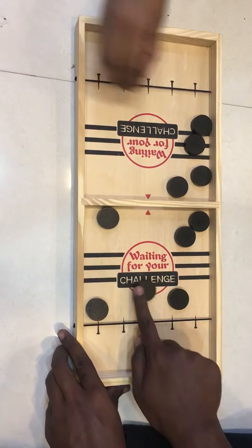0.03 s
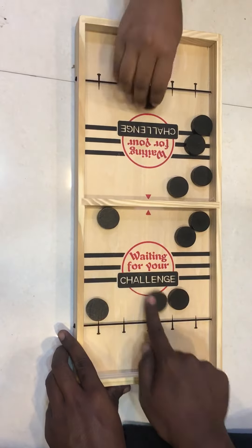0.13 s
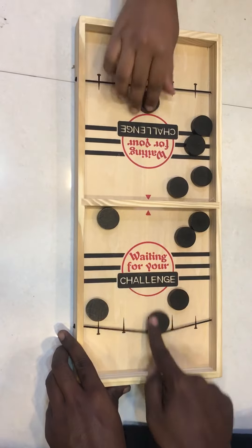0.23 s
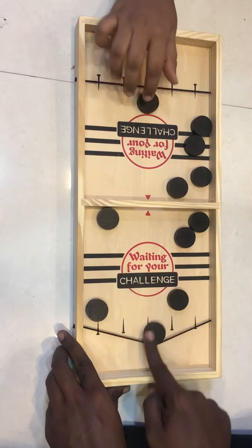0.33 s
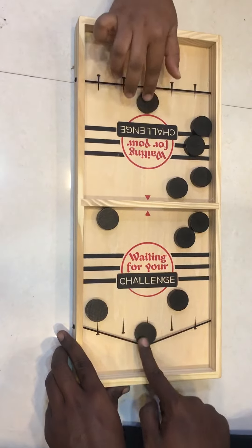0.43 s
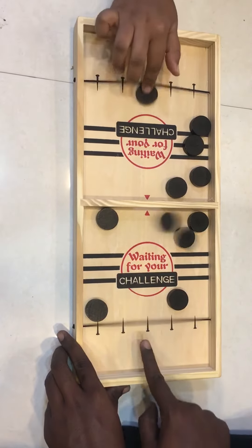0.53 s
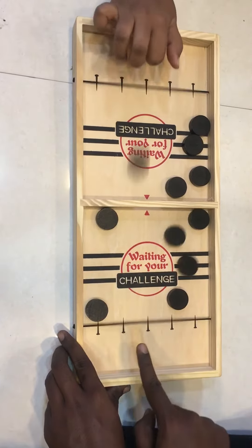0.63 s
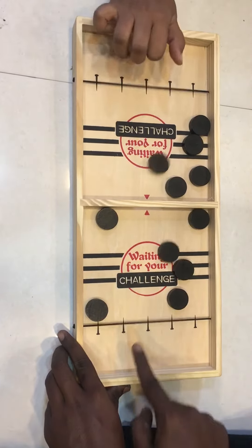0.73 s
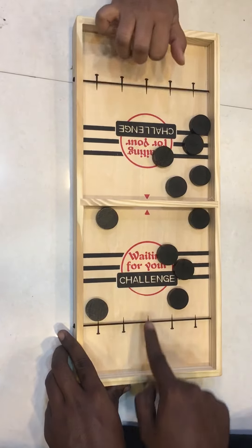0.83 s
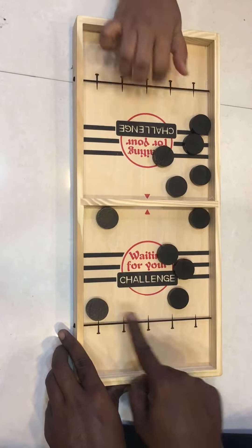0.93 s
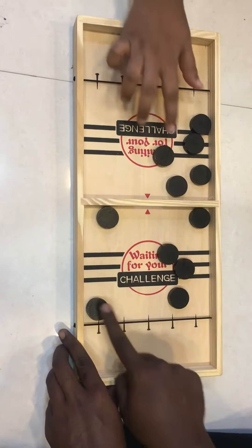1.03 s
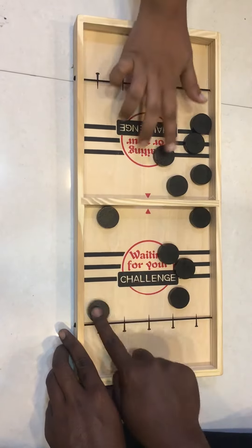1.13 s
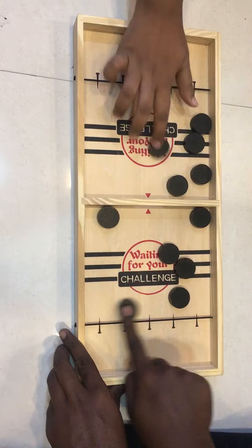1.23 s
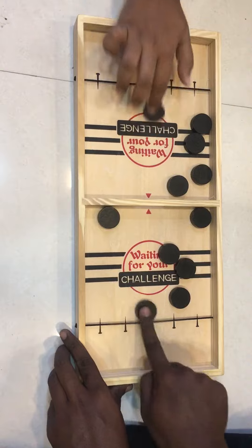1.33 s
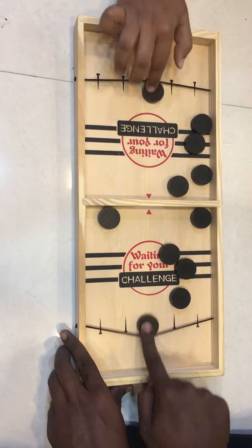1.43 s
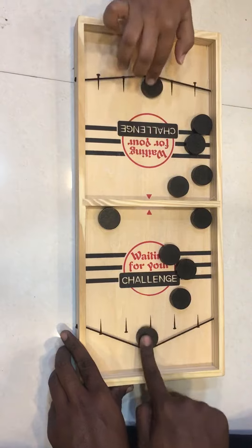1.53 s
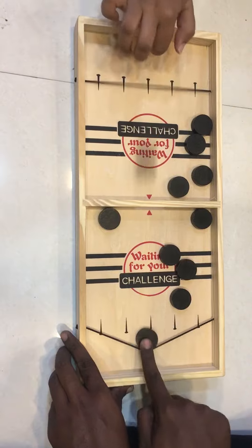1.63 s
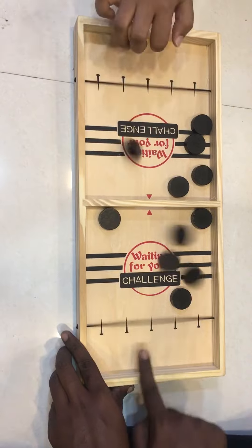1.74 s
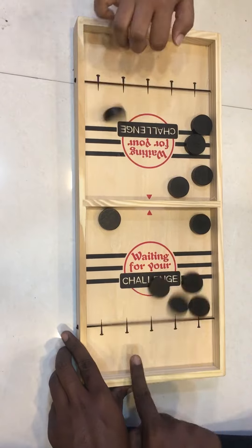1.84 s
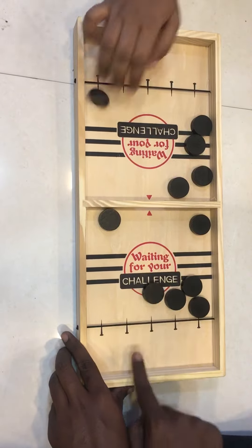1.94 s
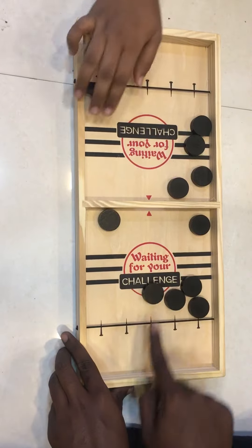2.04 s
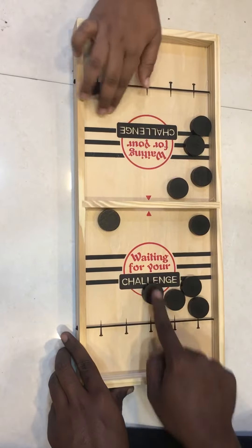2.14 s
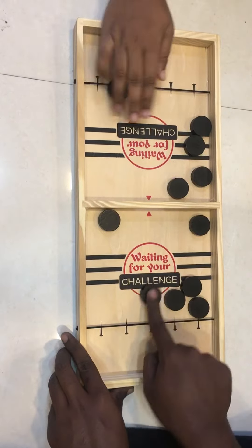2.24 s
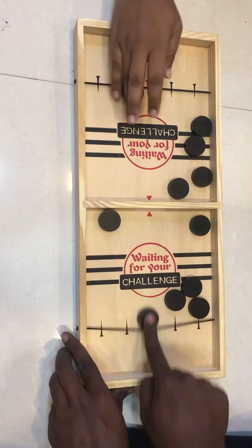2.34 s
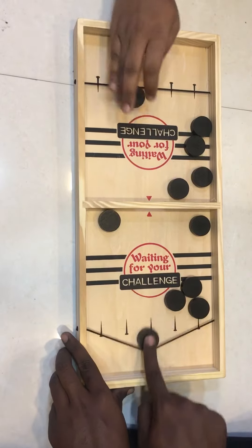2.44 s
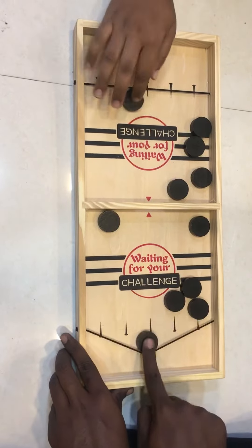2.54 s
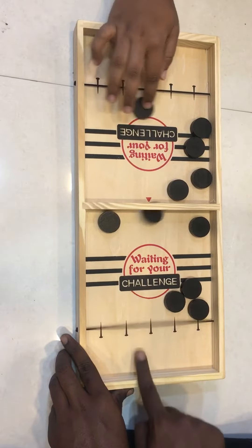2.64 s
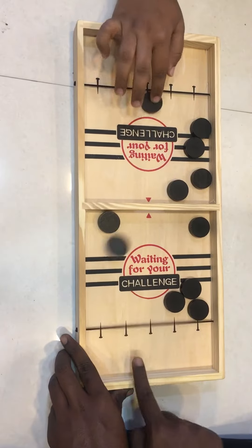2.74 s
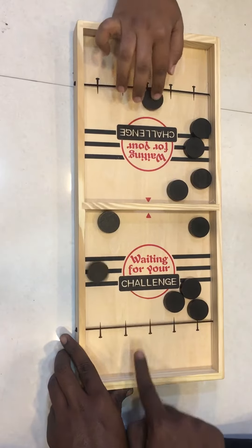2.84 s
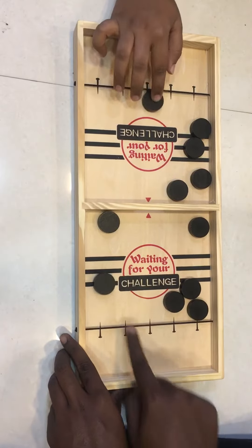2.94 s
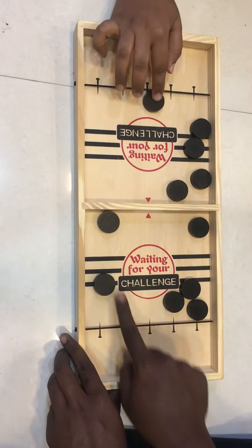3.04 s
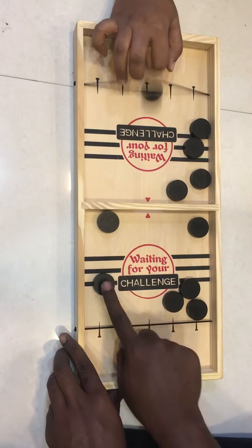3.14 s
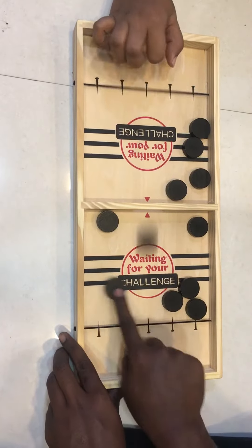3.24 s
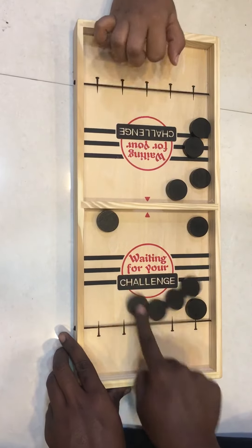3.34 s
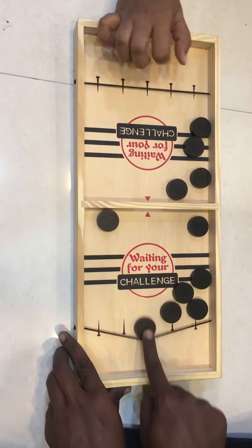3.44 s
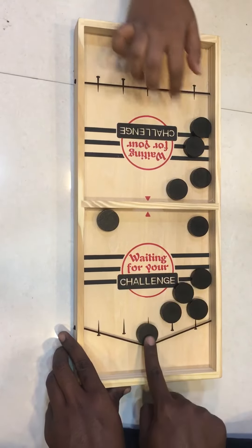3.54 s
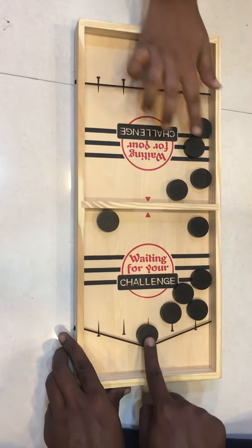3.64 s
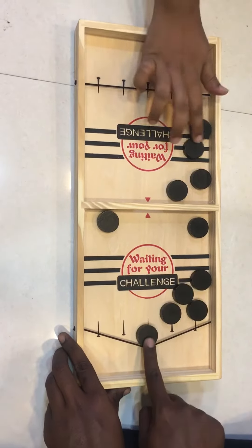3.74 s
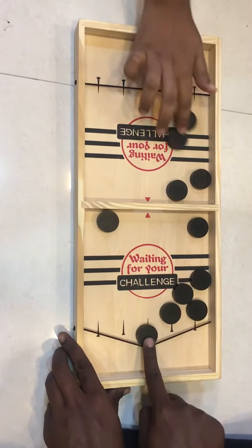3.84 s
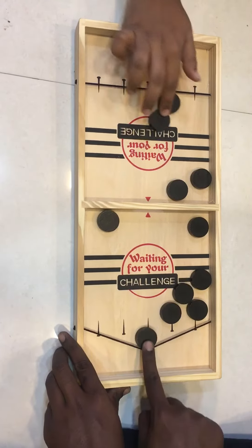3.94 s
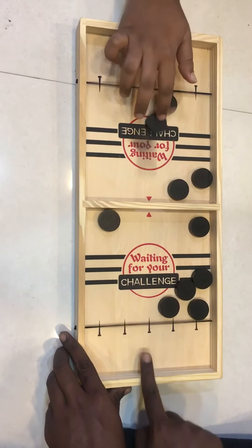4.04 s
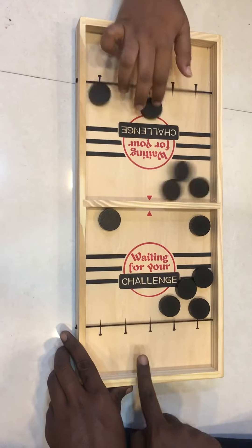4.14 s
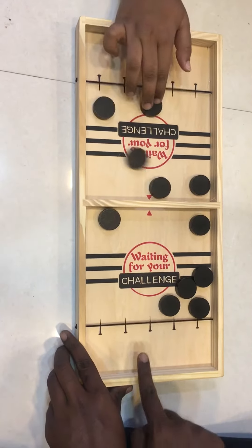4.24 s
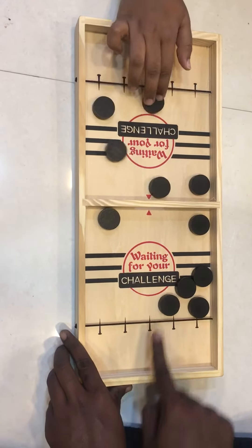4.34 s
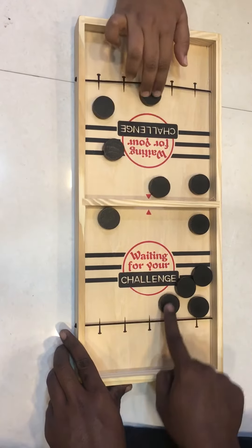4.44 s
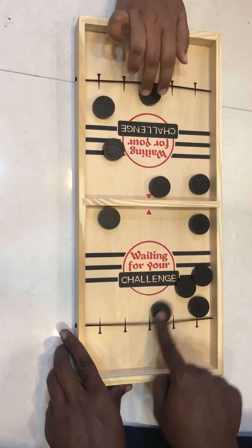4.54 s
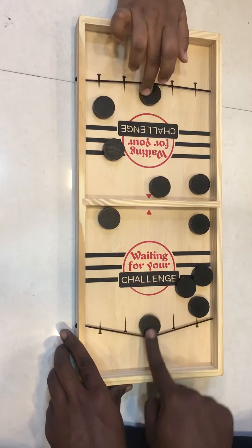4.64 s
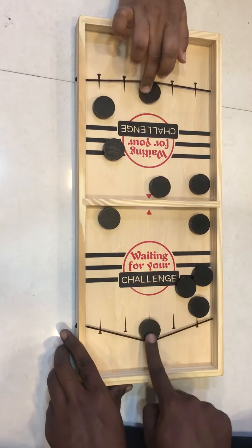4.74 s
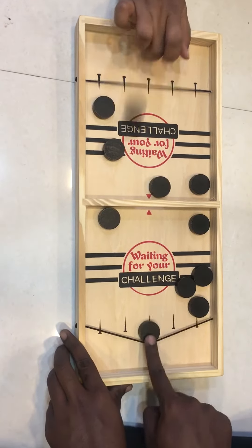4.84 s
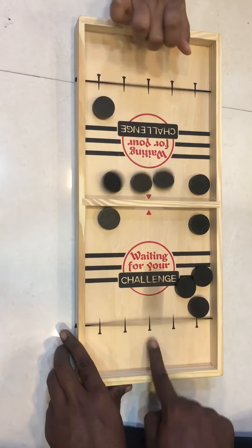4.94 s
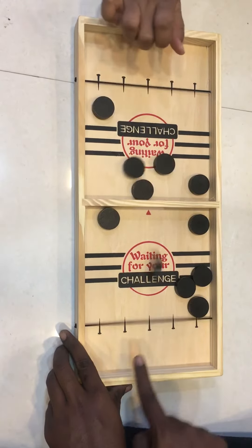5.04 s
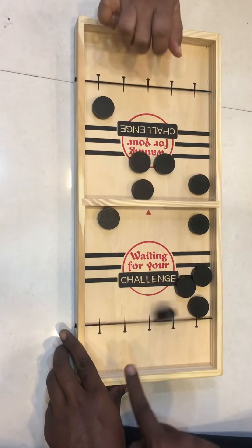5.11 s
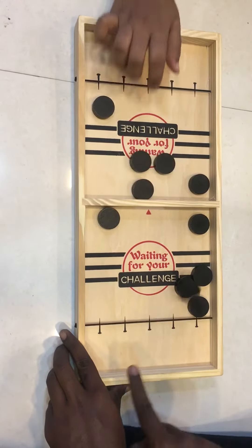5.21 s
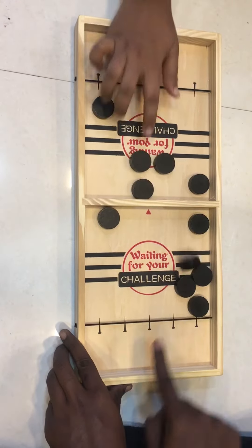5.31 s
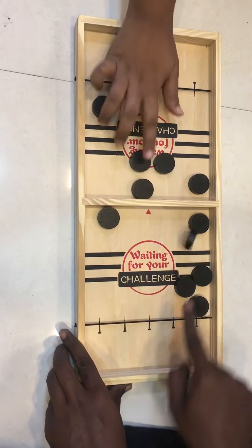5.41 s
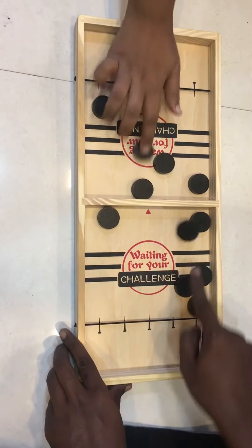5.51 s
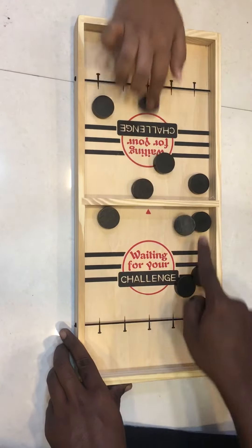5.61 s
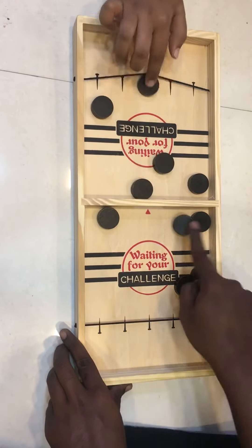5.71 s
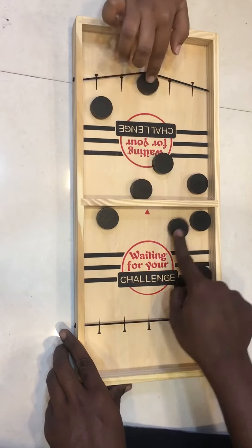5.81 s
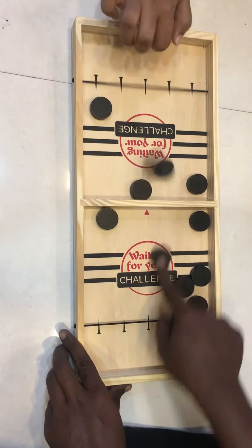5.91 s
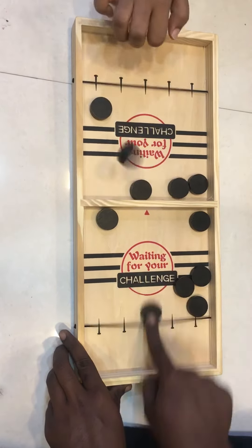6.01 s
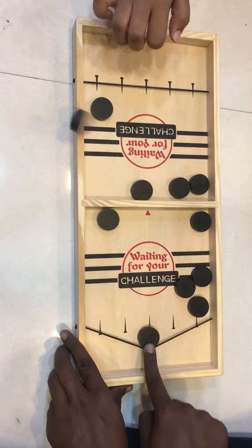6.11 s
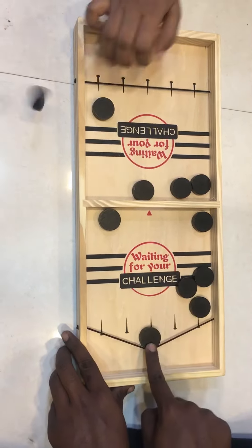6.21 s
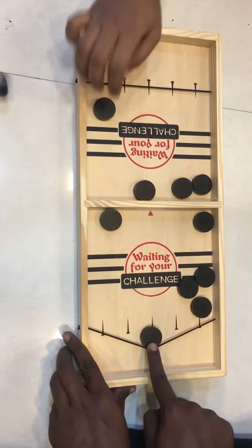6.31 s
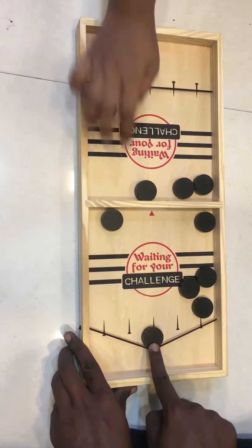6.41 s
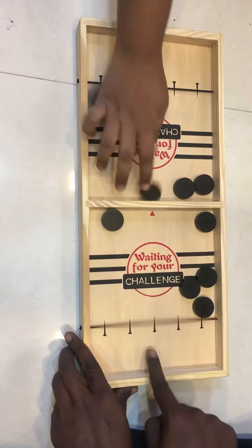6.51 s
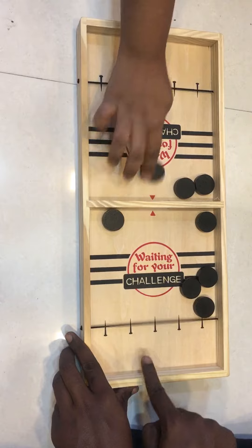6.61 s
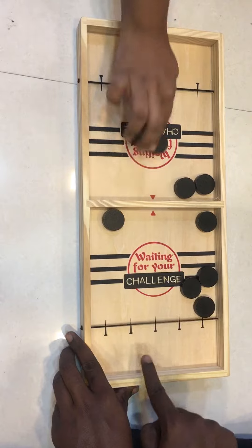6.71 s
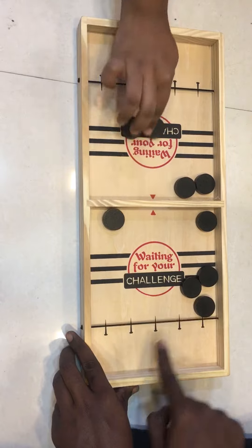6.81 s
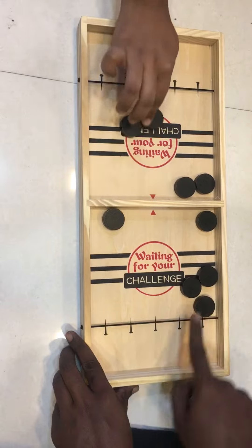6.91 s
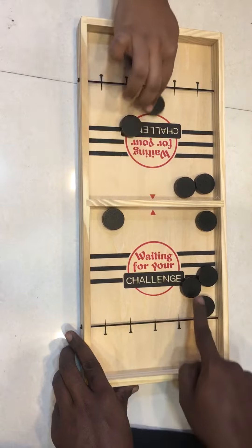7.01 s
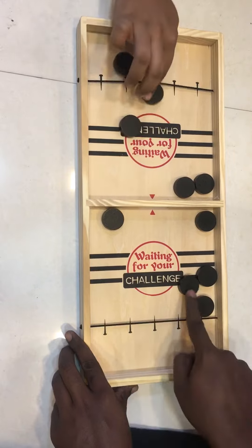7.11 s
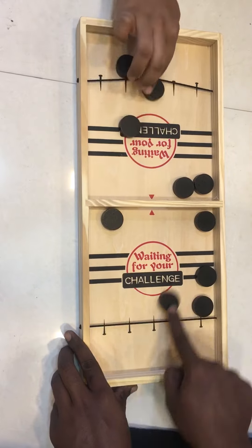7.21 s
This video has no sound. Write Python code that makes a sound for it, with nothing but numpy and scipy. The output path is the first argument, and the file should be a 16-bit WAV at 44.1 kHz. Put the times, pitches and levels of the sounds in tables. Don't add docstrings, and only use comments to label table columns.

```python
import sys
import numpy as np
from scipy import signal
from scipy.fft import rfft, irfft
from scipy.io import wavfile
from scipy.ndimage import uniform_filter1d

SR = 44100
rng = np.random.default_rng(int(sys.argv[2]) if len(sys.argv) > 2 else 0)


def linear_from_db(decibels):
    return 10 ** (np.asarray(decibels, float) / 20)


def int16_out(signal):
    q = np.round(np.clip(np.atleast_2d(signal).T, -1, 1) * 32767)
    wavfile.write(sys.argv[1], SR, q.astype(np.int16))


N = 320166


def unit_rms(x):
    return x / np.sqrt(np.mean(x ** 2) + 1e-20)


def unit_peak(x):
    return x / abs(x).max()


def read_spectrum(points, hz):
    f, value = np.transpose(points)
    return np.interp(np.log(hz + 1), np.log(f + 1), value)


def level_curve(rows):
    t, db = np.transpose(rows)
    return np.interp(np.arange(N) / SR, t, db)


def add(mix, start_s, sound):
    part = mix[round(start_s * SR):][:len(sound)]
    part += sound[:len(part)]


def colour(x, spectrum):
    gain_db = read_spectrum(spectrum, np.fft.rfftfreq(len(x), 1 / SR))
    return irfft(rfft(x) * linear_from_db(gain_db), len(x))


def tilt(spectrum, db_per_octave, pivot_hz):
    return [(f, db + db_per_octave * np.log2(f / pivot_hz)) for f, db in spectrum]


def resonate(x, hz, width_hz):
    turn = np.exp(2j * np.pi * np.cumsum(hz * np.ones(len(x))) / SR)
    r = np.exp(-np.pi * width_hz / SR)
    return 2 * (turn * signal.lfilter([1 - r], [1, -r], x / turn + 1e-18)).real


def ring_modes(modes, t, luck, spread_db, detune):
    total = 0
    for k, (hz, db, t60) in enumerate(modes):
        level_db = db + spread_db * luck[2 * k] - 60 * t / t60
        mode_hz = hz * (1 + detune * luck[2 * k + 1])
        total = total + linear_from_db(level_db) * np.sin(2 * np.pi * mode_hz * t)
    return total


def dense_modes(spectrum, t, t60, noise):
    return unit_peak(colour(noise, spectrum) * linear_from_db(-60 * t / t60))


# f/Hz, level/dB per Hz
AIR_SPECTRUM = [(18, -22.5), (31, -9.5), (41, -21.5), (62, 1), (100, -2), (140, -6.5), (185, -8),
                (240, -22), (290, -15.5), (380, -20), (1220, -25.5), (3160, -44.5), (4940, -59.5),
                (15500, -75)]


def air():
    frames, hz = N // 512 + 5, np.fft.rfftfreq(2048, 1 / SR)
    a, b, patches = rng.standard_normal((frames, 1025, 3)).T
    patches = unit_rms(uniform_filter1d(uniform_filter1d(patches, 20, 0), 8, 1))
    z = (a + 1j * b) * linear_from_db(read_spectrum(AIR_SPECTRUM, hz)[:, None] + 1.85 * patches)
    wash = signal.istft(z, nperseg=2048, noverlap=1536)[1][:N]
    return linear_from_db(-33) * unit_rms(wash)


# t/s, level/dB
TRAFFIC_LEVEL = [(0, -35), (1.2, -34), (2, -37.5), (3.3, -37), (4, -33), (4.9, -32), (6, -32.5),
                 (6.6, -36.5), (7.26, -34.5)]


def drone(hz, width_hz, level_db):
    boom = resonate(resonate(rng.standard_normal(N), hz, width_hz), hz, width_hz)
    walls = signal.butter(4, 50, "high", fs=SR, output="sos")
    return linear_from_db(level_curve(TRAFFIC_LEVEL) + level_db) * unit_rms(signal.sosfilt(walls, boom))


# start/s, length/s, level/dB, first f/Hz, last f/Hz
ENGINE_PASSES = [(0, 0.64, -32, 64.05, 67.9), (0, 0.69, -40, 108, 109.8), (0.681, 0.58, -34.5, 69.6, 59.6),
                 (.9, 0.82, -34.5, 129, 133), (.95, 0.27, -31, 107.5, 103.2),
                 (1.377, 0.32, -32.5, 85.4, 81.5), (1.551, 0.36, -40, 62.8, 61),
                 (2.079, 0.4, -34, 91.6, 86), (2.401, 0.47, -37, 73.4, 72.3),
                 (2.903, 0.47, -33.5, 109.4, 112), (3, 0.54, -40, 132.7, 138.3),
                 (3.399, 0.45, -30.5, 81.7, 76.1), (3.698, 0.48, -24.5, 74.8, 78.9),
                 (3.801, 0.72, -24, 99.46, 99.2), (4.363, 0.32, -31, 104, 109.7), (4.4, .7, -32, 72.86, 73),
                 (4.583, .5, -26, 99.2, 97.3), (5.098, 0.98, -36.5, 119, 113.5),
                 (5.198, 0.82, -31.5, 93.85, 89.86), (6.05, 0.26, -33, 62.5, 61.7),
                 (5.997, 0.88, -33.5, 112.6, 110.5), (6.749, 0.52, -34, 80.4, 88.1),
                 (6.9, .45, -32.5, 109.5, 108.7), (6.8, 0.61, -40.5, 63.8, 64.9)]


def engine_passes():
    out = np.zeros(N)
    for start_s, length_s, db, first_hz, last_hz in ENGINE_PASSES:
        part = np.linspace(0, 1, round(length_s * SR))
        wobble = unit_rms(uniform_filter1d(rng.standard_normal((2, len(part))), 4000))
        hz = first_hz + (last_hz - first_hz) * part + 0.61 * wobble[0]
        swell = np.sin(np.pi * part) ** 0.52 * linear_from_db(db + 1.05 * wobble[1])
        add(out, start_s, swell * np.sqrt(2) * np.sin(2 * np.pi * np.cumsum(hz) / SR))
    return out


# start/s, length/s, level/dB, eighth harmonic
# first f/Hz, last f/Hz
HORN_CALLS = [
    (0, .43, -50.5, 3290, 3310),
    (.9, .3, -55.5, 3200, 3300),
    (1.2, .26, -57.5, 3340, 3340),
    (6.26, .22, -60, 3150, 3150),
]
# multiple of fundamental, level/dB
HORN_HARMONICS = [(6, -13), (7, -10), (8, 0), (9, -10), (10, -15), (11, -22)]


def far_horn():
    out = np.zeros(N)
    for start_s, length_s, db, first_hz, last_hz in HORN_CALLS:
        part = np.linspace(0, 1, round(length_s * SR))
        turns = np.cumsum(first_hz + (last_hz - first_hz) * part) / 8 / SR
        echo_noise = rng.standard_normal(2 * len(part))
        echo = resonate(echo_noise, 0, width_hz=55).reshape(2, -1)
        lines = 0
        for k, level_db in HORN_HARMONICS:
            in_phase = .8 + .6 * unit_rms(np.roll(echo[0], 900 * k))
            quadrature = .6 * unit_rms(np.roll(echo[1], 900 * k))
            phase = 2 * np.pi * k * turns
            lines = lines + linear_from_db(level_db) * (in_phase * np.sin(phase) + quadrature * np.cos(phase))
        hiss = resonate(resonate(rng.standard_normal(len(part)), 9100, 800), 9100, 800)
        envelope = signal.windows.tukey(len(part), .12) * linear_from_db(db - 8 * part ** 2)
        add(out, start_s, envelope * (lines + linear_from_db(-27) * unit_rms(hiss)))
    return out


# f/Hz, t60/s
ROOM_DECAY = [(300, 0.79), (1000, 0.28), (3000, 0.26), (8000, 0.19), (16000, 0.27)]


def room(x):
    taps = np.zeros(SR // 2)
    at = np.arange(120, len(taps) - 20, 20)
    taps[at + rng.integers(0, 20, len(at))] = rng.choice([-1., 1.], len(at))
    hz, t, z = signal.stft(taps, SR, nperseg=256)
    decay = linear_from_db(-60 * t / read_spectrum(ROOM_DECAY, hz)[:, None])
    tail = signal.istft(z * decay, SR, nperseg=256)[1]
    return signal.fftconvolve(x, tail / np.linalg.norm(tail))[:N]


# t/s, tick level/dB, ring level/dB
TILE_BOUNCES = [
    (6.263, -31.5, -36),
    (6.3307, -51, -36.5),
    (6.39, -33.5, -29),
    (6.4287, -35, -38),
    (6.459, -35, -40),
]
# f/Hz, level/dB, t60/s
TILE_MODES = [(3100, 11, 0.013), (3200, -16, 0.2), (5430, -20, 0.013), (12900, -47, 0.038)]
# f/Hz, level/dB per Hz
CRACK_SPECTRUM = [(1200, -74), (2600, 4), (4300, 4), (6500, 0), (9000, -8.5), (12000, -19.5),
                  (15500, -27.5), (16600, -82)]


def tile_bounces():
    out, t = np.zeros(N), np.arange(4096) / SR
    rise = np.minimum(t / 0.0005, 1)
    for start_s, tick_db, ring_db in TILE_BOUNCES:
        noise = rng.standard_normal(len(t))
        tick = colour(noise, CRACK_SPECTRUM) * rise * linear_from_db(-60 * t / 0.012)
        ring = rise * ring_modes(TILE_MODES, t, noise, 1.1, 0.0031)
        add(out, start_s, linear_from_db(tick_db) * unit_peak(tick))
        add(out, start_s, linear_from_db(ring_db + 5) * unit_peak(ring))
    return out


# t/s, level/dB
SHUFFLE_LEVEL = [(0, -56), (.34, -63), (.95, -74), (1.2, -59), (1.6, -57.5), (2.6, -48.5), (2.9, -59),
                 (3.15, -54), (4.8, -56.5), (5.6, -54), (6.4, -49.5), (6.67, -48), (6.8, -52.5),
                 (7.26, -46.5)]
# f/Hz, level/dB per Hz
SCRAPE_SPECTRUM = [(100, -57), (300, -26.5), (600, 3), (1200, 8.5), (2500, -4), (4000, -14), (7000, -25.5),
                   (10000, -36), (15000, -43)]
# start/s, length/s, level/dB, tilt/dB per octave
PUCK_SKIDS = [(1.128, 0.29, -48.5, 2), (2.72, 0.2, -39, -4.5), (3.21, 0.14, -49.5, 2.5),
              (3.71, 0.28, -44.5, -3), (4.495, .1, -56.5, 3), (5.277, 0.12, -37.5, -10.5),
              (5.492, 0.15, -43, 1.5), (1.8, 0.033, -47, 5), (5.74, 0.061, -38, -3.5),
              (4.045, 0.026, -49, 1)]
# start/s, length/s, level/dB
PUCK_RATTLES = [(0.515, 0.12, -35), (1.702, 0.13, -31.5), (2.611, 0.071, -29.5), (4.103, 0.088, -35.5),
                (4.881, 0.056, -30.5), (5.892, 0.08, -39), (6.457, 0.092, -31.5)]


def slides():
    size_db = 2.2 * np.minimum(rng.exponential(1, N), 4)
    grains_per_s = 5000
    grains = rng.standard_normal(N) * linear_from_db(size_db) * (rng.random(N) < grains_per_s / SR)
    out = linear_from_db(level_curve(SHUFFLE_LEVEL) + 1) * unit_rms(colour(grains, SCRAPE_SPECTRUM))
    rattles = [(*row, -1.5) for row in PUCK_RATTLES]
    for start_s, length_s, db, tilt_db in [*PUCK_SKIDS, *rattles]:
        part = grains[::-1][round(start_s * SR):][:round(length_s * SR)]
        scrape = unit_rms(colour(part, tilt(SCRAPE_SPECTRUM, tilt_db, 1000)))
        add(out, start_s, linear_from_db(db) * scrape * signal.windows.tukey(len(part), .7))
    return out


# t/s, body level/dB, body f/Hz, crack level/dB
PUCK_CLACKS = [(.559, -17, 1670, -43), (1.767, -19, 1270, -65), (2.578, -36.5, 710, -56),
               (2.632, -15.5, 1510, -37), (2.815, -25.5, 1520, -52), (4.103, -17, 1140, -32.5),
               (4.112, -22.5, 1500, -37.5), (4.124, -24, 1510, -51), (4.135, -26, 1580, -44),
               (4.881, -13.5, 853, -38.5), (4.987, -20.5, 1160, -49), (5.976, -37, 1260, -64),
               (6.511, -13.5, 1420, -30.5)]
GATE_GLANCES = [(0.161, -24, 1194, -51), (.177, -24.5, 550, -59), (1.7, -9.5, 1260, -29),
                (1.991, -25, 1530, -50), (2.536, -20.5, 694, -48), (2.62, -10, 1310, -29),
                (4.041, -17.5, 662, -27.5), (4.149, -20.5, 946, -46.5), (4.864, -18.5, 1050, -42),
                (4.971, -7, 1290, -30), (5.079, -17, 1350, -39.5), (6.116, -13, 1060, -34.5),
                (6.501, -20, 1350, -28.5), (6.663, -19, 1334, -41)]
RAIL_KNOCKS = [(.468, -31, 600, -58), (0.509, -10, 1248, -28), (.537, -23, 1090, -37),
               (0.592, -25.5, 1070, -58), (.663, -18, 1310, -50), (1.656, -5, 730, -29),
               (1.721, -17, 704, -41), (1.781, -14, 745, -34.5), (1.806, -19.5, 1760, -47),
               (1.826, -19, 665, -40.5), (1.887, -30, 620, -62), (2.293, -21.5, 1050, -49),
               (3.203, -38, 560, -57.5), (3.282, -25.5, 820, -51), (3.33, -18, 585, -38),
               (3.98, -27, 1105, -62), (3.998, -33.5, 900, -61), (5.256, -15.5, 830, -34.5),
               (5.507, -23.5, 1040, -53), (5.862, -35, 574, -52), (5.898, -20.5, 880, -40),
               (5.909, -16, 1070, -41), (5.926, -10.5, 1267, -49), (6.469, -6, 831, -26.5),
               (6.535, -21, 875, -38.5), (7.061, -23.5, 1050, -62)]
BOARD_THUDS = [(0.606, -20, 784, -61), (1.6, -32, 616, -58), (1.795, -20.5, 790, -52),
               (1.871, -35, 673, -59), (2.264, -17.5, 737, -44.5), (2.512, -24.5, 1180, -64),
               (2.654, -18, 743, -55), (2.866, -31.5, 696, -74), (2.909, -29, 850, -70),
               (4.087, -30.5, 1235, -50), (4.853, -25, 840, -44), (4.907, -20.5, 1060, -44),
               (5.058, -35, 864, -66), (5.295, -19.5, 784, -53), (5.338, -32, 796, -72),
               (5.768, -14, 703, -39.5), (5.758, -25, 1000, -66), (6.139, -28, 1000, -60),
               (6.43, -25.5, 603, -50), (6.494, -27, 780, -39), (6.522, -21, 1040, -55),
               (6.546, -26, 840, -44), (6.602, -20, 1110, -58), (7.129, -23, 830, -58),
               (7.185, -24, 846, -67), (7.232, -26.5, 790, -74)]
# puck ring re body level/dB, body t60/s
BLOW_KINDS = [
    (-2, 0.04),
    (-8, 0.045),
    (-11.5, 0.045),
    (-14.5, 0.038),
]
# f/Hz, level/dB
BOARD_SPECTRUM = [(100, -64.5), (350, -15.5), (540, -10.5), (720, -2), (1300, -5), (1900, -9),
                  (2400, -24.5), (4000, -61.5)]
# f/Hz, level/dB
PUCK_SPECTRUM = [(900, -73), (1800, -11.5), (2300, 3.5), (3000, 3.5), (3800, -6), (4600, -19), (5600, -20),
                 (9000, -54)]
# f/Hz, level/dB, t60/s
PUCK_MODES = [(2690, 1, 0.0068), (4233, -7, 0.022)]


def knocks():
    out, t = np.zeros(N), np.arange(4096) / SR
    high_pass = signal.butter(2, 480, "high", fs=SR, output="sos")
    rise = np.minimum(t / 0.002, 1) ** 1.35
    blow_lists = (PUCK_CLACKS, GATE_GLANCES, RAIL_KNOCKS, BOARD_THUDS)
    for blows, (ring_db, t60) in zip(blow_lists, BLOW_KINDS):
        for start_s, body_db, hz, crack_db in blows:
            luck, noise = rng.standard_normal(4), rng.standard_normal((3, len(t)))
            spot = linear_from_db(-60 * t / (0.38 * t60)) * np.sin(2 * np.pi * hz * t)
            board_spectrum = tilt(BOARD_SPECTRUM, 4.5 * np.log2(hz / 950), 950)
            board = dense_modes(board_spectrum, t, 1.09 * t60, noise[0])
            body = signal.sosfilt(high_pass, rise * (spot + 0.59 * board))
            puck = .5 * ring_modes(PUCK_MODES, t, luck, 2.1, 0.041)
            puck = puck + dense_modes(PUCK_SPECTRUM, t, 0.79 * t60, noise[1])
            crack = dense_modes(CRACK_SPECTRUM, t, 0.017, noise[2])
            crack = crack + 0.094 * dense_modes(CRACK_SPECTRUM, t, 0.071, noise[0])
            add(out, start_s, linear_from_db(body_db + 3) * unit_peak(body))
            add(out, start_s, linear_from_db(body_db + ring_db + 2) * unit_peak(rise * puck))
            add(out, start_s, linear_from_db(crack_db + 9) * unit_peak(rise * crack))
    return out


def scene():
    street = air() + drone(75, 36, -1.9) + drone(111.2, 40, -1.6) + engine_passes()
    game = far_horn() + tile_bounces() + slides() + knocks()
    return (street + game + linear_from_db(-10.5) * room(game))[None]


def band_limit(x):
    return signal.sosfilt(signal.butter(12, 16520, fs=SR, output="sos"), x)


def record(dry):
    low_pass = signal.firwin(255, 16250, window=("kaiser", 8), fs=SR)
    mix = signal.oaconvolve(dry, low_pass[None], "same")
    return band_limit(mix)


dry = scene()
out = record(dry)
int16_out(out)
```